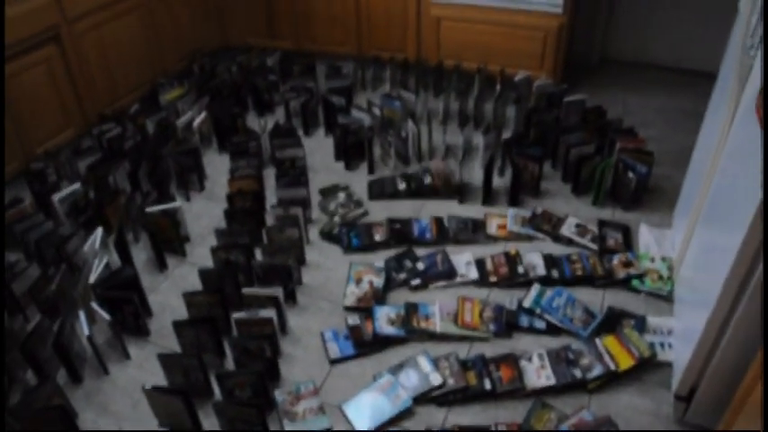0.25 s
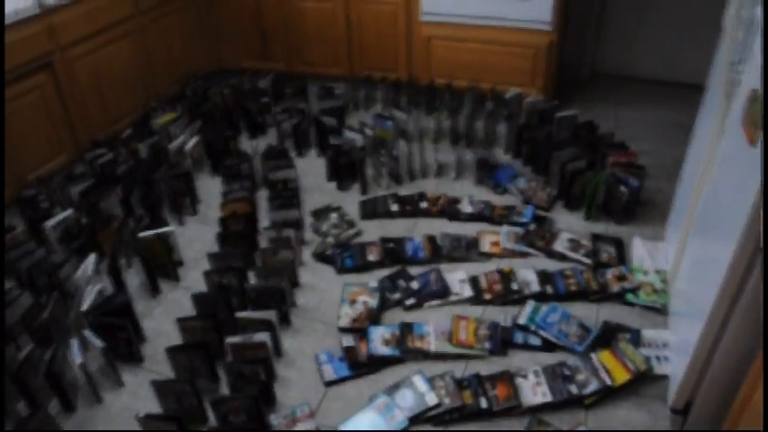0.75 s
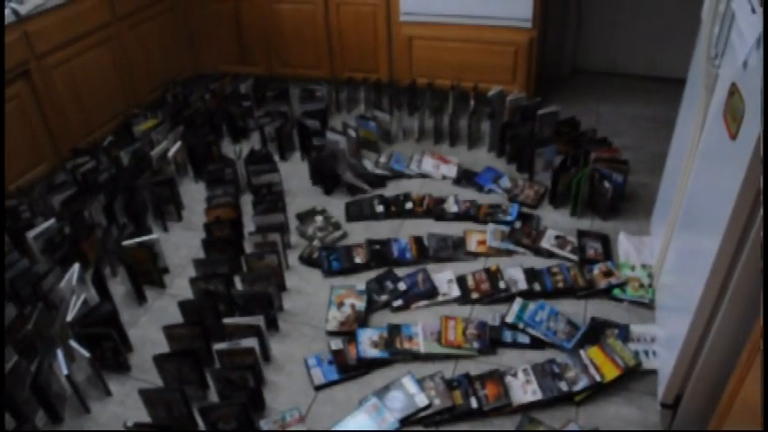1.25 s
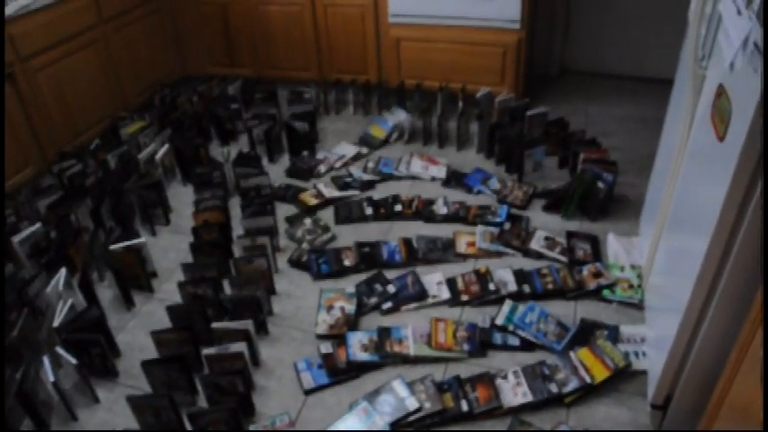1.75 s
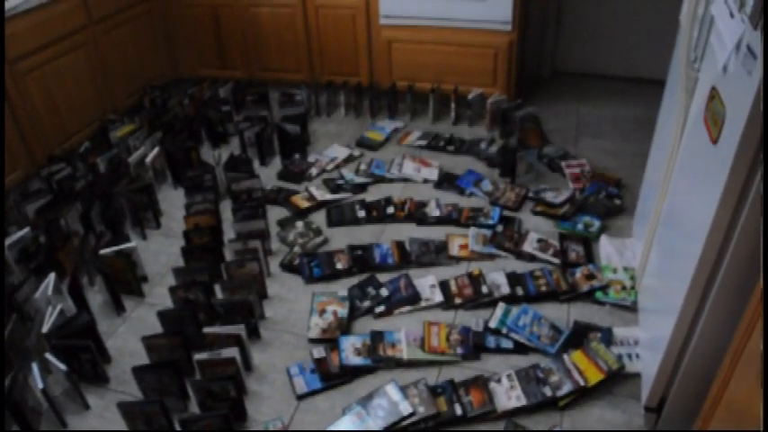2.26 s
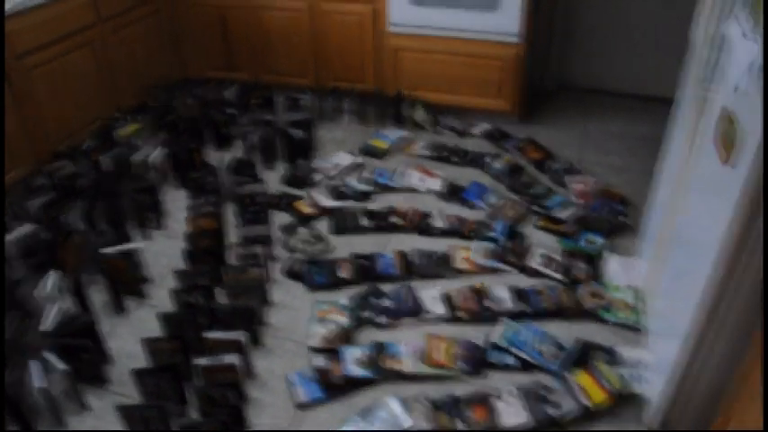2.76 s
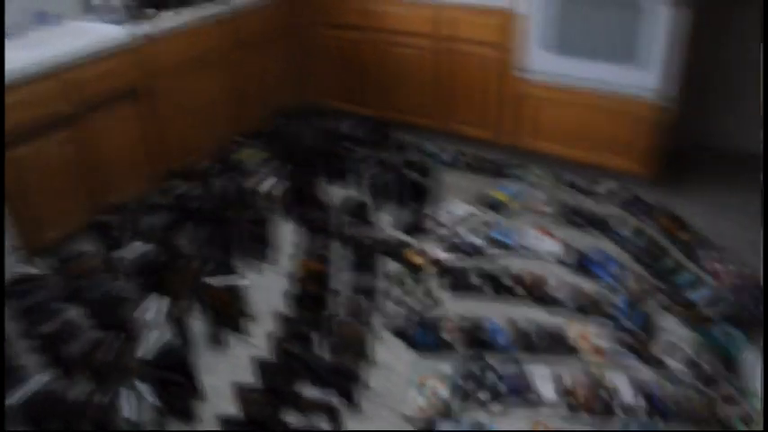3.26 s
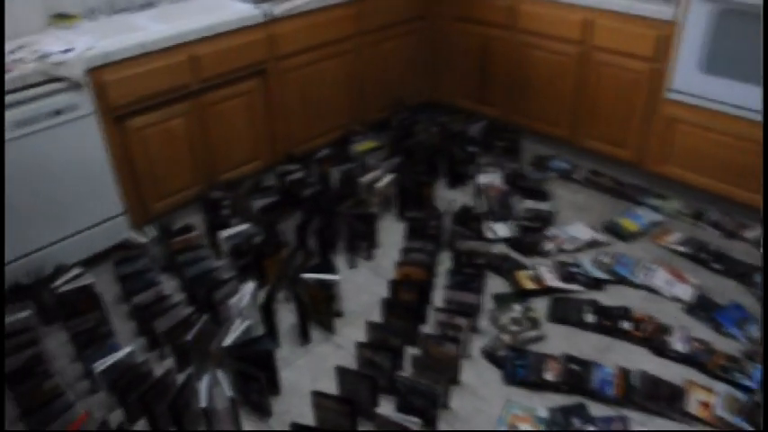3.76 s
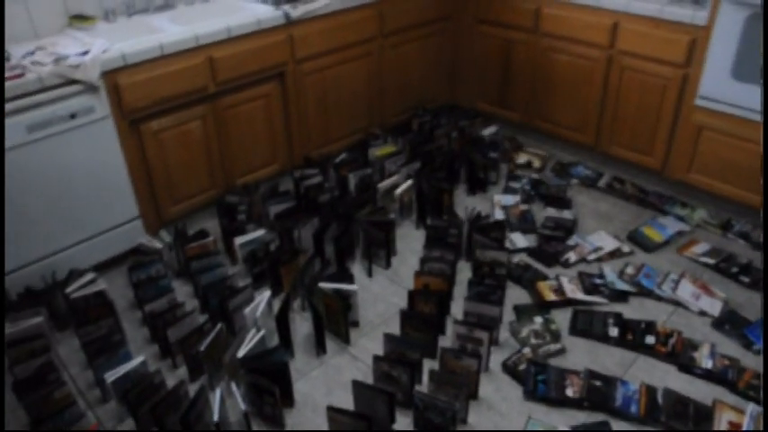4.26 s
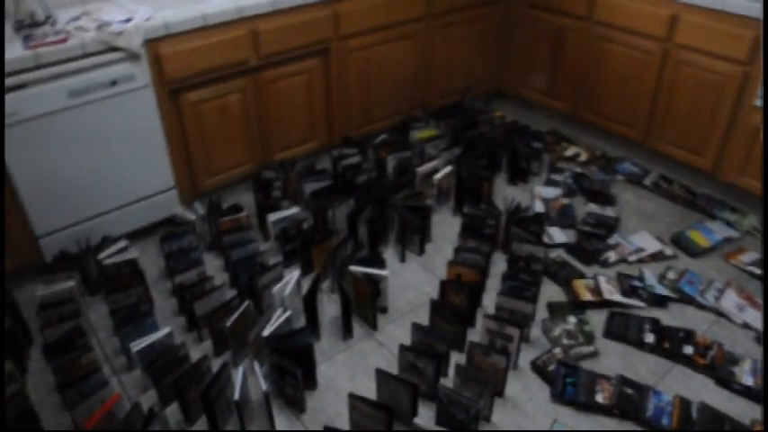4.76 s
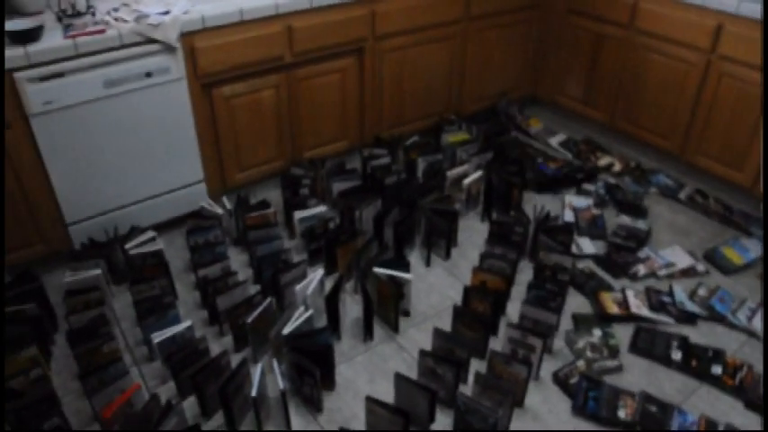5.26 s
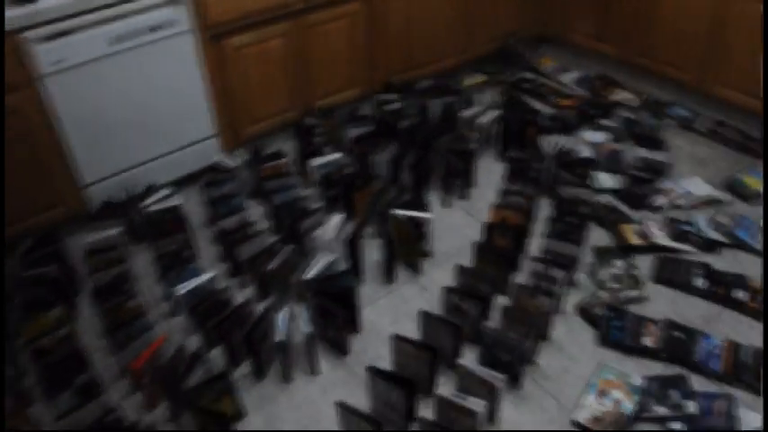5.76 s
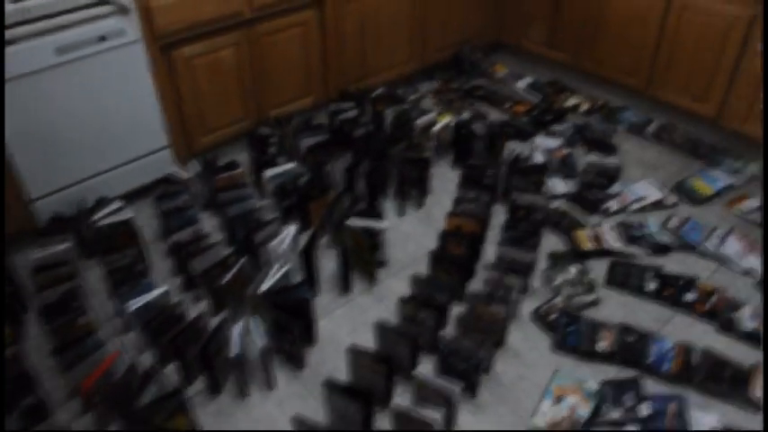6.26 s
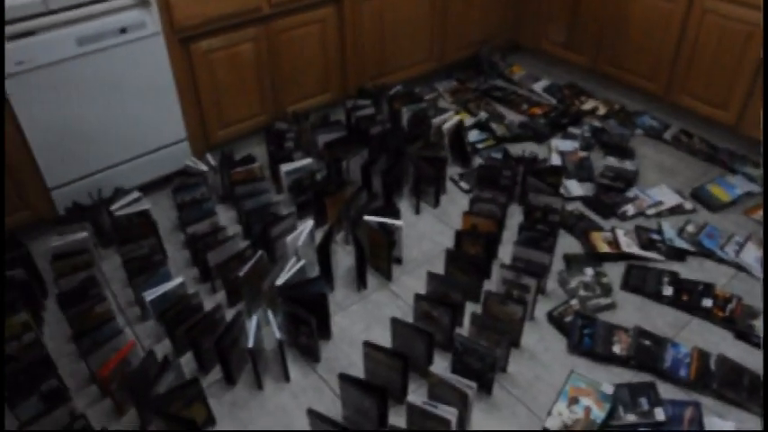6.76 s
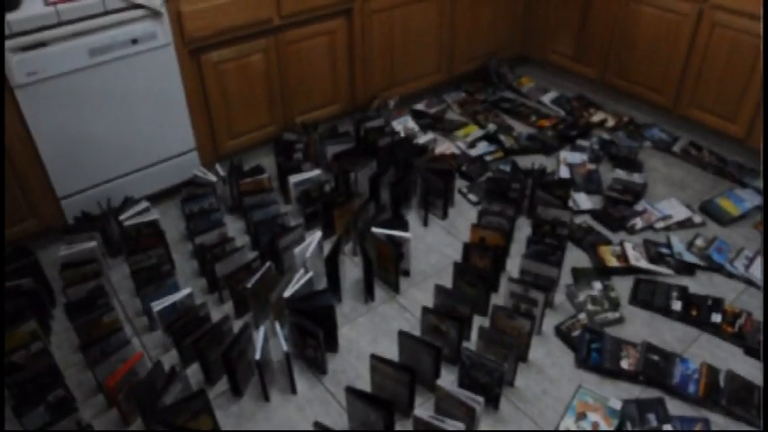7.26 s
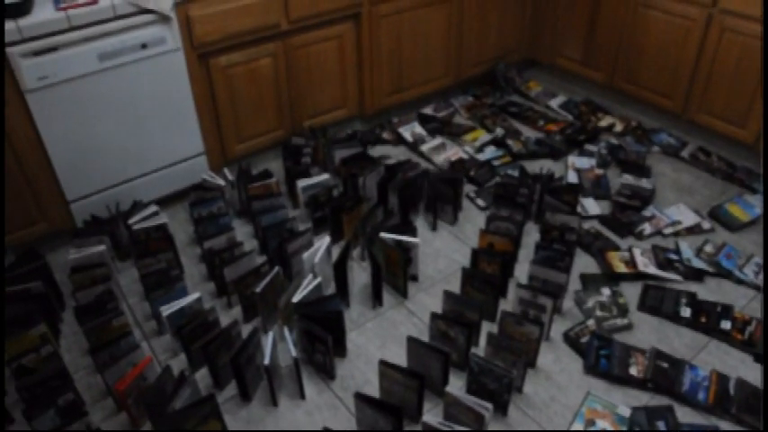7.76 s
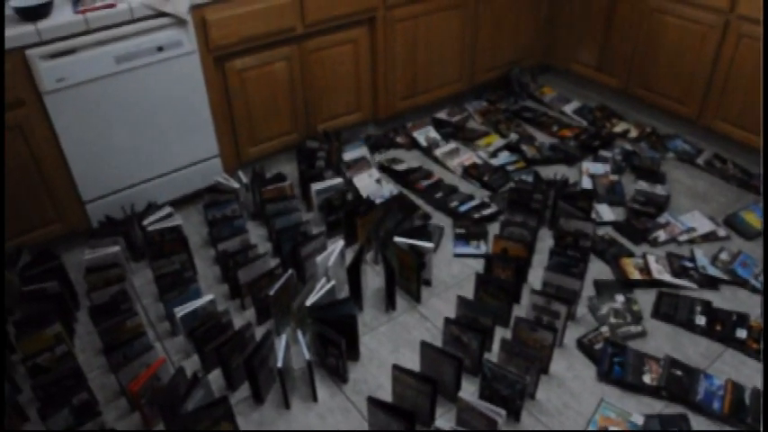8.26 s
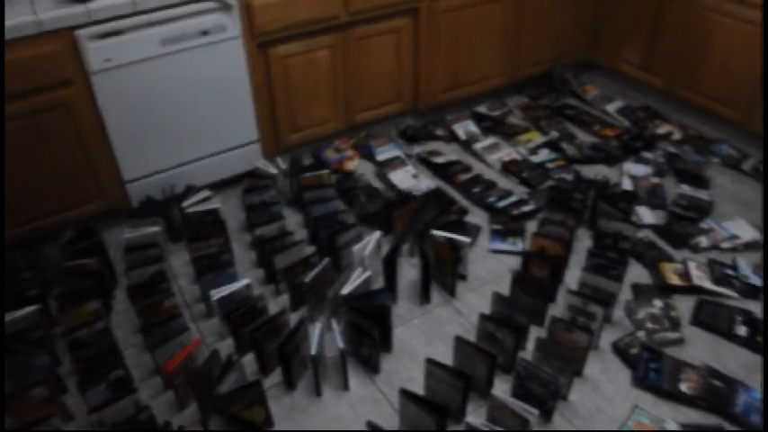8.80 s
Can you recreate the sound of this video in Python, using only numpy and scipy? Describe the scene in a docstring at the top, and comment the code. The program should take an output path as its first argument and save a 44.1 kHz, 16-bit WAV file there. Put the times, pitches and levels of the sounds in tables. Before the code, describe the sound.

From the very start, plastic disc cases topple in a domino chain on a kitchen's tiled floor. Rapid cracks and clacks, a fall every few hundredths of a second, come in short runs with tiny breaks near 0.5, 0.9 and 1.35 s. Hollow flat slaps land at about 0.9 and 2.4 s; from 1.5 to 3.2 s the clatter is dense and hard. Shorter bursts follow, with a strong slap at 3.7 s and gaps up to 5.3 s. Heavy, flatter smacks and low thuds hit around 5.4 to 5.7 s. It thins from 6.1 to 7.1 s with isolated knocks and a faint disc ping near 7.0, then runs steadily again to 9 s, ending mid-clatter. Loose lids rattle throughout. Dense half-second echoes and boxy resonance surround it, over faint air and hum; the small microphone rounds peaks and dulls treble.

```python
"""In a tiled kitchen, rows of plastic disc cases topple like dominoes, a few metres from a small microphone.
The chain goes in runs with short pauses; each fall is a tight cluster of contacts ringing damped case modes.
Hard landings crack, clack and knock; flat ones slap on trapped air, heavy ones thud on the floor.
Loose lids and discs rattle through each run, then settle, and now and then a disc pings.
Dense decaying echoes and a few standing waves smear it all, over faint air noise and hum."""
import sys
import numpy as np
from scipy import signal
from scipy.io import wavfile

SR = 44100
rng = np.random.default_rng(int(sys.argv[2]) if len(sys.argv) > 2 else 0)


def transcribe(u):
    """Save the signal u as a 16-bit wav file named by the first command-line argument.

    u: samples, shape (n,) or (channels, n), limited to [-1, 1]; the rate is SR.
    q: integer samples, one column per channel.
    """
    v = np.clip(np.atleast_2d(u).T, -1, 1)
    q = np.round(v * 32767).astype(np.int16)
    wavfile.write(sys.argv[1], SR, q)


N = 398223  # samples

# All table levels are relative: mix levels and the microphone act on them later.
# faint air of the still room: f/Hz, level/dB
AIR_SPECTRUM = [(20, -27), (50, -14), (75, -14.5), (110, -3), (200, 2), (560, 1), (900, -6), (3000, -16),
                (8000, -19)]
# runs of lighter falls: start t/s, end t/s, edge crack level/dB, shell clack level/dB,
# hollow body level/dB, rattle level/dB
RUNS_OF_FALLS = [(0.001, 0.488, -12, -20.5, -29.5, -21), (0.576, 0.86, -22.5, -29, -30.5, -21.5),
                 (0.964, 1.32, -19.5, -23, -26, -25), (1.387, 1.455, -22, -36.5, -41, -24.5),
                 (1.454, 1.822, -13.5, -20.5, -31.5, -21), (1.863, 2.401, -13, -21.5, -22, -21),
                 (2.449, 2.732, -20, -24, -38, -22.5), (2.75, 3.178, -23, -25, -30, -21.5),
                 (3.264, 3.497, -17.5, -25, -31, -17.5), (3.618, 3.776, -18, -28, -32, -17),
                 (3.941, 4.034, -19, -21.5, -28, -21), (4.036, 4.529, -11, -19, -26, -20),
                 (4.571, 4.647, -24, -23, -22, -26), (4.767, 4.872, -21, -26, -27, -28),
                 (4.89, 5.059, -12, -20.5, -23, -24), (5.24, 5.322, -21.5, -21, -31, -25.5),
                 (5.348, 6.045, -18, -21, -28, -24.5), (6.185, 6.39, -28, -31, -37.5, -35),
                 (6.409, 6.51, -20, -27, -39, -24), (6.595, 6.678, -19, -24.5, -32, -27),
                 (6.924, 6.96, -28, -35.5, -37, -44), (7.04, 7.12, -21, -28, -29, -29),
                 (7.135, 7.332, -21, -19, -21.5, -20.5), (7.408, 7.794, -15.5, -22.5, -33.5, -25),
                 (7.881, 7.95, -32, -33, -38, -33), (7.967, 8.371, -19, -27, -33, -22),
                 (8.458, 9.002, -15.5, -23, -26, -23.5)]
# hardest landings; a glancing one sends more sound sideways into the room:
# t/s, edge crack level/dB, shell clack level/dB, hollow body level/dB, room level/dB
HARD_FALLS = [(0.0512, -5.5, -34.5, -23, -5), (0.0675, -8.5, -15, -19, 4), (0.1552, -9, -18, -20, -2.5),
              (0.3774, -6.5, -15.5, -30, 2), (0.4086, -20, -22, -27.5, -7), (0.6088, -16.5, -27, -43, 7.5),
              (0.7739, -7, -14, -20, -2), (0.8457, -7.5, -20, -23.5, 2), (0.8819, -20, -14.5, -12.5, -3),
              (1.057, -11.5, -16.5, -20, -0.5), (1.1247, -14, -16.5, -18.5, 3.5),
              (1.167, -9.5, -11, -17, -6), (1.194, -16, -26, -17, -2), (1.454, -8, -17, -30, 3),
              (1.495, -12, -14, -30, 3.5), (1.5293, -9.5, -15.5, -29, -3), (1.5795, -2.5, -14, -25, -1),
              (1.6471, 0, -13, -27, -4), (1.8573, -5.5, -14, -20, -3.5), (1.8975, -15, -17.5, -21.5, 0),
              (1.9203, -9.5, -15, -25, 0), (2.0105, -9.5, -16.5, -20, 3.5), (2.0623, -8.5, -13.5, -37.5, 3),
              (2.0844, -9, -20.5, -18.5, 3.5), (2.2484, -7, -17.5, -19, 0.5), (2.2744, -11, -13, -18, -2.5),
              (2.336, -6.5, -14, -18, -1), (2.421, 1, -9, -22, -5), (2.514, -12, -17.5, -27, -3.5),
              (2.6347, -16.5, -22.5, -28, 6.5), (2.7511, -3, -13, -19, -1.5), (2.808, -4, -14, -18.5, -2),
              (2.8722, -9, -14.5, -20, -4), (2.9462, -7, -14, -38, -4), (2.9936, -8.5, -16, -20, -3),
              (3.055, -9.5, -19, -25, 5.5), (3.1016, -5.5, -10.5, -27, -1),
              (3.1199, -8, -16.5, -18.5, -0.5), (3.3342, -10, -17.5, -26, 2.5),
              (3.434, -11, -17.5, -29, 2.5), (3.4794, -12.5, -21.5, -39, 2), (3.6196, -17, -25, -38, 7.5),
              (3.657, -11, -16.5, -39, -2.5), (3.7086, -2, -9, -23.5, -2.5), (3.8363, -19, -21.5, -24, 4),
              (4.0422, -6, -12, -24, -1.5), (4.164, -6, -17, -18, -5.5), (4.2327, -6, -15, -26, 1.5),
              (4.3497, -11, -18.5, -26.5, 1), (4.395, -11.5, -15.5, -30, -1.5),
              (4.4312, -12.5, -18.5, -33.5, 5.5), (4.574, -7.5, -14, -19, -2),
              (4.8836, -6.5, -13.5, -19.5, -0.5), (4.9391, -3.5, -9, -15.5, -8.5),
              (4.977, -11, -16, -33, 1.5), (5.3509, -16.5, -19, -21.5, 7.5), (5.408, -12.5, -16, -28, 3.5),
              (5.4383, -4.5, -21, -31, -3.5), (5.475, -7.5, -16, -31, 3.5), (5.6, -11.5, -15, -19, 2),
              (5.6214, -12.5, -21.5, -21.5, 3), (5.6676, -5.5, -12, -12, -15),
              (5.677, -14, -10.5, -9, -8.5), (5.835, -15, -15.5, -20, -1), (5.9892, -8, -11.5, -16, -0.5),
              (6.0247, -14, -22, -28, 3), (6.4436, -11.5, -17.5, -23, 5), (6.4686, -8.5, -22, -17, -4),
              (6.6053, -3, -10.5, -16, -5.5), (7.1188, -9.5, -14.5, -29, 1.5),
              (7.1543, -11.5, -15, -21.5, 2), (7.186, -9, -16.5, -20, -1.5), (7.2671, -12, -28, -18.5, 0.5),
              (7.414, -11, -27, -27.5, 3.5), (7.5027, -15.5, -23, -22, 7), (7.5418, -10.5, -14, -15.5, 1.5),
              (7.5833, -10, -20, -28, 0), (7.7136, -18, -16, -27, 1), (7.7326, -5.5, -19.5, -21, 1.5),
              (7.9635, -14, -18, -32, 4), (7.9986, -10.5, -19, -26, 3.5), (8.057, -7.5, -11.5, -31, -5.5),
              (8.0743, -9.5, -18.5, -25, 1.5), (8.279, -14.5, -19, -24.5, 8.5), (8.3094, -8, -18, -24, 1.5),
              (8.4512, -5, -12.5, -13.5, -1), (8.5147, -10, -15, -30, -2), (8.6082, -14.5, -20, -27, 9.5),
              (8.6378, -5, -13.5, -17.5, -4.5), (8.71, -4, -11, -23, -2), (8.7776, -15, -17.5, -24, 0.5),
              (8.9019, -13, -19.5, -27, 1.5), (8.9533, -6.5, -17, -28.5, 1), (8.9994, -8, -17, -23, 2.5)]
# heavily damped modes of a plastic case, before detuning: f/Hz, level/dB, t60/s
CASE_MODES = [(226, -8, 0.016), (373, -8, 0.063), (618, 1.5, 0.016), (886, 2, 0.018), (1133, -4.5, 0.02),
              (1709, -3, 0.019), (2220, 1, 0.0062), (3030, 2.5, 0.0052), (3960, 0.5, 0.0064),
              (5160, 5.5, 0.0041), (6800, -7, 0.0021)]
# spectrum of loose lids and discs: f/Hz, level/dB
RATTLE_SPECTRUM = [(40, -27), (120, -13.5), (250, 3), (600, -7.5), (1100, 3.5), (1600, 0), (4000, -2.5),
                   (7000, -7.5)]
# blows heavy enough to shake the floor: t/s, level/dB
FLOOR_THUDS = [(0.07, -50), (0.38, -44), (1.852, -54), (2.089, -41.5), (2.341, -40.5), (2.42, -51),
               (3.708, -39), (4.571, -38), (4.94, -45), (5.441, -40), (5.605, -32.5), (5.65, -53),
               (7.263, -39), (7.359, -41.5), (8.454, -34), (8.501, -41)]
# cases that land flat and squeeze the air out: t/s, level/dB, hollow pitch f/Hz, t60/s
FLAT_SLAPS = [(0.884, 0.5, 279, 0.054), (0.897, 3, 405, 0.031), (1.166, -8, 620, 0.023),
              (1.578, -2, 767, 0.025), (2.423, 0.5, 874, 0.036), (3.708, 0, 943, 0.018),
              (3.94, -2.5, 547, 0.018), (4.777, -10, 915, 0.026), (4.939, 0, 628, 0.043),
              (5.44, 4.5, 1056, 0.019), (5.676, 6.5, 525, 0.02), (5.995, -7, 1205, 0.032),
              (6.612, -12, 1040, 0.03), (8.278, -16, 1100, 0.026), (8.635, -5, 1234, 0.035)]
# loose discs that ring on for a moment: t/s, level/dB, f/Hz, t60/s
DISC_PINGS = [(1.3854, -17, 2200, 0.073), (7.0404, -16.5, 3690, 0.06)]
# decay of the room's tail, band by band: f/Hz, t60/s
ROOM_DECAY = [(100, 0.35), (400, 0.57), (1000, 0.52), (2800, 0.5), (7000, 0.5)]
# standing waves between floor, cupboards and walls: f/Hz, level/dB, t60/s
STANDING_MODES = [(99.3, 7.5, 0.39), (118, 0.5, 1), (225.6, -0.5, 1), (342, 0.5, 1), (472, -3, 0.088),
                  (577, -11.5, 1), (674, -11.5, 0.5), (890, -12, 0.6), (1122, -3.5, 0.44)]
# microphone response ahead of the peak rounding: f/Hz, level/dB
MICROPHONE_RESPONSE = [(30, -8.5), (100, -6), (220, -3.5), (1000, 0.5), (1450, 2.5), (2300, 3.5), (3700, 2),
                       (5000, -2.5), (5550, -11), (5950, -8.5), (6500, -9.5)]
# treble lost after the peak rounding: f/Hz, level/dB
TREBLE_ROLLOFF = [(5500, 0), (6300, -2), (6900, -11), (7300, -18.5), (7650, -34), (11500, -35),
                  (13000, -48.5)]

HUM_HZ, HUM_DB = 59.3, -53  # hum level ahead of the microphone
EDGE_HZ = 12600  # cutoff of the final low-pass
FALL_GAP_S, FALL_JITTER = 0.042, 0.15  # aimed-for pace; timing scatter as a share of it
HARD_CLUSTER_S, LIGHT_CLUSTER_S = 0.011, 0.01  # decay times of a fall's contacts
LIGHT_ROOM_DB = 0  # sideways level of the lighter falls
LIGHT_SPREAD_DB = 1.0  # scatter of the lighter falls in a run
FIRST_DB, EASE_S = 1.5, 0.04  # a run opens this much louder, then eases with this time constant
SETTLE_S, SHAKE_DB = 0.022, -16.5  # rattle decay time; rattle jolt relative to a hard fall's crack
LINGER_DB, LINGER_S = -19, 0.08  # softer, slower second stage of the rattle's decay


def gain_of(db):
    """Decibels to amplitude."""
    return 10 ** (np.asarray(db) / 20)


def unit(x):
    """Scales to an energy of one."""
    return x / np.sqrt(np.sum(x ** 2) + 1e-20)


def read(points, hz):
    """Reads a table on a log-frequency axis."""
    f, value = np.transpose(points)
    return np.interp(np.log(hz + 1), np.log(f + 1), value)


def add(mix, s, sound):
    """Lays a sound into the mix at time s."""
    part = mix[max(round(s * SR), 0):][:len(sound)]
    part += sound[:len(part)]


def colour(x, points, size=4096):
    """Causal, minimum-phase filter with the given spectrum."""
    hz = abs(np.fft.fftfreq(size, 1 / SR))
    log_gain = np.log(gain_of(read(points, hz)))
    taps = np.fft.ifft(np.exp(np.conj(signal.hilbert(log_gain)))).real
    return signal.oaconvolve(x, taps[:size // 2])[:len(x)]


def still_room(air_db=-41.5):
    """Faint air noise and the steady hum of an appliance."""
    t = np.arange(N) / SR
    air = unit(colour(rng.standard_normal(N), AIR_SPECTRUM)) * np.sqrt(N)
    hum = np.sin(2 * np.pi * HUM_HZ * t)
    return gain_of(air_db) * air + gain_of(HUM_DB) * hum


def kitchen(x, wet_db=2.5, gap_s=0.0018, build_s=0.0025, near=0.59, near_s=0.014):
    """Room reply from one spot: early echoes lifted as if off near cupboards, a tail dying band by band."""
    echoes = rng.standard_normal(SR) * (rng.random(SR) < 5000 / SR)  # about 5000 a second
    hz, t, bands = signal.stft(echoes, SR, nperseg=256)
    decay = gain_of(-60 * t / read(ROOM_DECAY, hz)[:, None])
    tail = signal.istft(bands * decay, SR, nperseg=256)[1][:SR]
    age = np.maximum(np.arange(SR) / SR - gap_s, 0)
    tail *= (1 - np.exp(-age / build_s)) * (1 + near * np.exp(-age / near_s))
    return gain_of(wet_db) * signal.oaconvolve(x, unit(tail))[:N]


def light_falls():
    """Each case tips the next at a nearly even pace between hard landings, with slight level scatter."""
    hard, rows = np.array([row[0] for row in HARD_FALLS]), []
    for start, end, *strength_db, _ in RUNS_OF_FALLS:
        marks = [start, *hard[(hard > start) & (hard < end)], end]
        paced = np.concatenate([
            np.linspace(a, b, max(round((b - a) / FALL_GAP_S), 1), endpoint=False)
            for a, b in zip(marks, marks[1:])])
        for s in paced:
            if abs(hard - s).min() > FALL_GAP_S / 2:  # leave hard landings clear
                chance = rng.standard_normal(4)
                opening_db = FIRST_DB * np.exp((start - s) / EASE_S)
                db = strength_db + LIGHT_SPREAD_DB * chance[1:] + opening_db
                late_s = (s > start) * chance[0] * FALL_JITTER * FALL_GAP_S  # a run's start stays put
                rows.append((s + late_s, *db))
    return rows


def all_falls():
    """Hard and light falls: t/s, crack, clack, body and room level/dB, cluster decay/s."""
    hard = [(*row, HARD_CLUSTER_S) for row in HARD_FALLS]
    light = [(*row, LIGHT_ROOM_DB, LIGHT_CLUSTER_S) for row in light_falls()]
    return hard + light


def case_ring(t, spread=0.13, tick=18.6):
    """One contact: a tick plus damped modes, each detuned by chance; the struck spot sets their signs."""
    hz, db, t60 = np.transpose(CASE_MODES)[:, :, None]
    shift, spot = rng.standard_normal((2, len(CASE_MODES), 1))
    pitch = hz * np.exp(spread * shift)
    envelope = np.sign(spot) * gain_of(db - 60 * t / t60)
    ring = (envelope * np.sin(2 * np.pi * pitch * t)).sum(0)
    ring[0] += tick
    return ring


def contacts(t, decay_s, per_s=1500, gather_s=0.0015):
    """The first touch, then corners, lid and disc hitting in a cluster that gathers and dies."""
    sign = rng.choice([-1, 1], len(t))
    later = sign * rng.uniform(0.37, 0.98, len(t)) * (rng.random(len(t)) < per_s / SR)
    push = later * (1 - np.exp(-t / gather_s)) * np.exp(-(t / max(decay_s, .003)) ** 0.94)
    push[0] = 0.9
    return push


def falling_cases(crack_db=17.0, clack_db=22.0, body_db=21.5, count=16, size=4):
    """Contacts ring body, shell and edges by their own amounts, straight ahead and off each wall."""
    lowest_hz, low_hz, high_hz = 185, 550, 1400  # body, shell and edge bands start here
    t = np.arange(2048) / SR
    splits = ((high_hz, "high"), ([low_hz, high_hz], "band"), ([lowest_hz, low_hz], "band"))
    parts = [signal.butter(3, edge, kind, fs=SR, output="sos") for edge, kind in splits]
    rings = np.array([case_ring(t) for _ in range(count * size)])
    # one blow goes straight to the microphone; the others leave sideways and come back off the walls
    direct, walls = np.zeros(N), np.zeros((count, N))
    for k, (s, crack, clack, body, room_db, decay_s) in enumerate(all_falls()):
        pushes = np.array([contacts(t, decay_s) for _ in range(size + 1)])
        chosen = rings[rng.integers(0, len(rings), size + 1)]
        blows = signal.fftconvolve(pushes, chosen, axes=1)[:, :len(t)]
        # edges crack, the shell clacks, the hollow body knocks
        bands = np.array([signal.sosfilt(part, blows) for part in parts])
        bands /= np.linalg.norm(bands, axis=2, keepdims=True)
        levels = gain_of([crack + crack_db, clack + clack_db, body + body_db])
        ahead, *sideways = np.tensordot(levels, bands, 1)
        add(direct, s, ahead)
        for j, sound in enumerate(sideways):
            add(walls[(k * size + j) % count], s, gain_of(room_db) * sound / np.sqrt(size))
    return direct + sum(kitchen(wall) for wall in walls)


def shaking(rise_s=0.0083):
    """Rattle envelope: held up through a run, jolted by each hard landing, then settling in two stages."""
    t, power = np.arange(2 * SR) / SR, np.zeros(N)
    jolts = [(start, end - start, db) for start, end, *_, db in RUNS_OF_FALLS]
    jolts += [(s, 0, crack + SHAKE_DB) for s, crack, *_ in HARD_FALLS]
    for s, hold, db in jolts:
        age = np.maximum(t - hold, 0)
        release = np.exp(-age / SETTLE_S) + gain_of(LINGER_DB) * np.exp(-age / LINGER_S)
        add(power, s, (gain_of(db) * np.minimum(t / rise_s, 1) * release) ** 2)
    return np.sqrt(power)


def rattle(level_db=-10.5, per_s=280, spread_db=2.0, count=24, size=3):
    """Many small contacts among the settling cases, heard from a few heaps."""
    t = np.arange(1024) / SR
    rings = [unit(case_ring(t)) for _ in range(count)]
    # contacts come at random moments: mostly light, a few hard
    heaps = np.zeros((size, N))
    for k, (when, force, which) in enumerate(rng.random((int(per_s * N / SR), 3))):
        strength = gain_of(-spread_db * np.log(max(force, .02)))
        add(heaps[k % size], when * N / SR, strength * rings[int(which * count)])
    level = gain_of(level_db) * shaking()
    heaps = [unit(colour(heap, RATTLE_SPECTRUM)) * np.sqrt(N / size) * level for heap in heaps]
    return sum(heap + kitchen(heap, wet_db=4.0) for heap in heaps)


def standing_waves(x):
    """Narrow resonators: the few pitches that the kitchen holds on to."""
    out = np.zeros(N)
    for hz, db, t60 in STANDING_MODES:
        pole = np.exp((2j * np.pi * hz - np.log(1000) / t60) / SR)
        wave = signal.lfilter([1 - abs(pole)], [1, -pole], x + 0j).real
        out += gain_of(db) * 2 * wave
    return out


def thuds(level_db=6.5, floor_hz=95, ring_s=0.012, room_db=-6.0):
    """The floor gives under a heavy blow and swings for a cycle or two."""
    t, out = np.arange(SR // 6) / SR, np.zeros(N)
    swing = t / ring_s * np.exp(-t / ring_s) * np.sin(2 * np.pi * floor_hz * t)
    for s, db in FLOOR_THUDS:
        add(out, s, gain_of(db + level_db) * swing)
    return out + kitchen(out, wet_db=room_db)


def ringing(rows, level_db, rise_s, room_db):
    """One dying tone a row, each echoing from its own spot in the room."""
    t, out = np.arange(SR // 2) / SR, np.zeros(N)
    for s, db, hz, t60 in rows:
        envelope = gain_of(level_db + db - 60 * t / t60) * (1 - np.exp(-t / rise_s))
        tone = envelope * np.sin(2 * np.pi * hz * t)
        add(out, s, tone)
        add(out, s, gain_of(room_db) * np.linalg.norm(tone) * unit(kitchen(tone)))
    return out


def slaps():
    """The air pocket under a flat case rings briefly at its hollow pitch."""
    return ringing(FLAT_SLAPS, level_db=-0.5, rise_s=0.0023, room_db=-2.0)


def discs():
    """A jolted disc gives a thin, short ping."""
    return ringing(DISC_PINGS, level_db=-9.0, rise_s=.002, room_db=-2.0)


def scene():
    """The whole chain in the kitchen, over the still room."""
    clatter = falling_cases() + rattle() + thuds() + slaps() + discs()
    return (clatter + standing_waves(clatter) + still_room())[None]


def record(dry, lopsided=0.017):
    """A small microphone rounds the peaks a little unevenly and loses treble; a steep low-pass follows."""
    pressure = colour(dry[0], MICROPHONE_RESPONSE)
    rounded = np.tanh(pressure + lopsided) - np.tanh(lopsided)
    heard = colour(rounded, TREBLE_ROLLOFF)
    low_pass = signal.firwin(511, EDGE_HZ, window=("kaiser", 9), fs=SR)
    return signal.oaconvolve(heard, low_pass, "same")[None]


dry = scene()
out = record(dry)
transcribe(out)
```